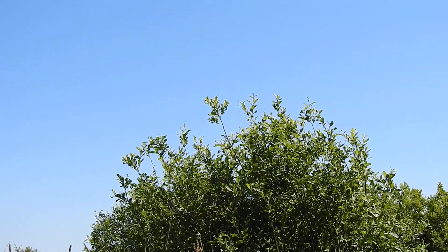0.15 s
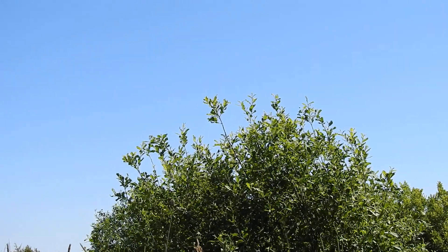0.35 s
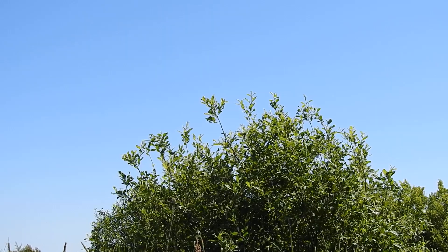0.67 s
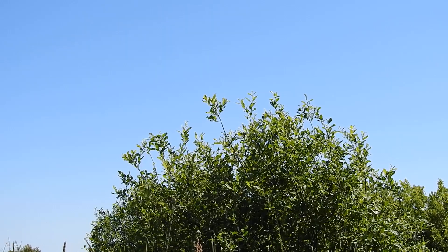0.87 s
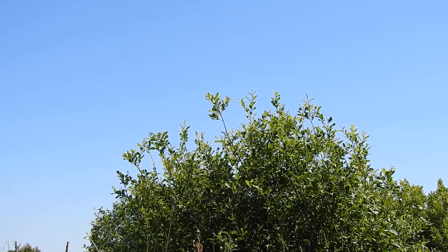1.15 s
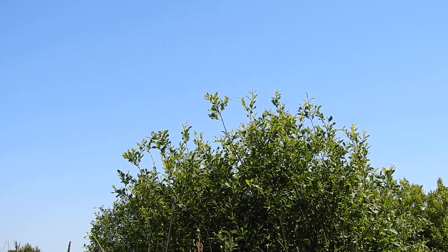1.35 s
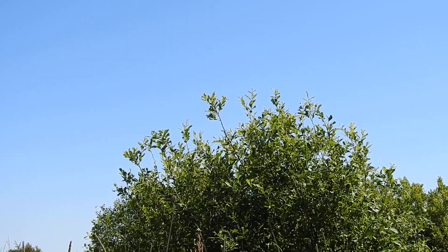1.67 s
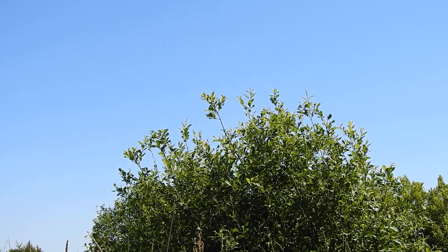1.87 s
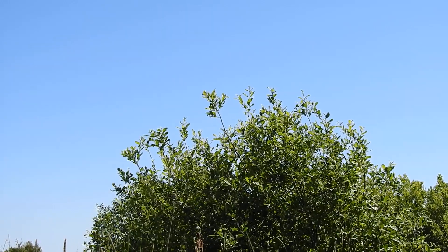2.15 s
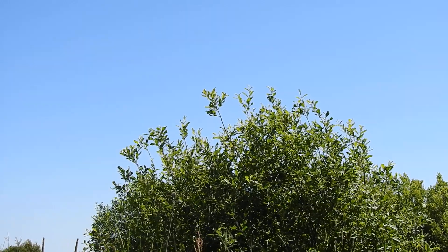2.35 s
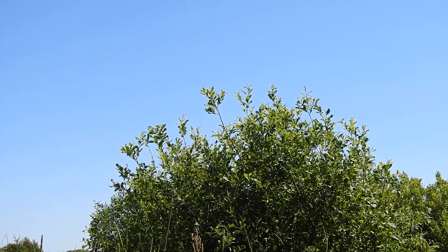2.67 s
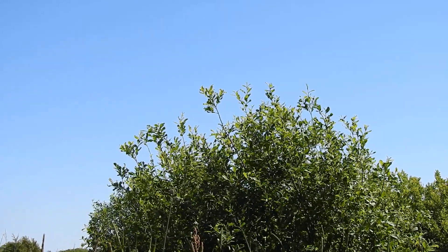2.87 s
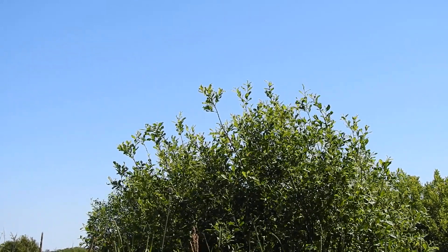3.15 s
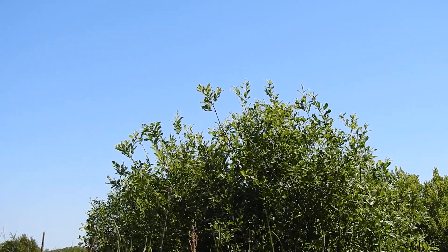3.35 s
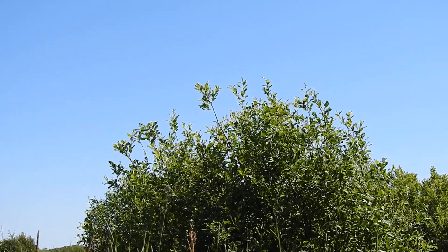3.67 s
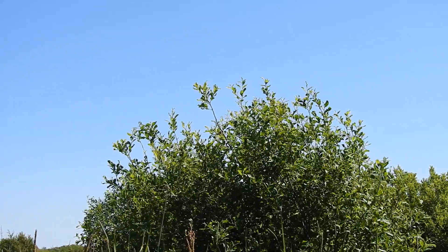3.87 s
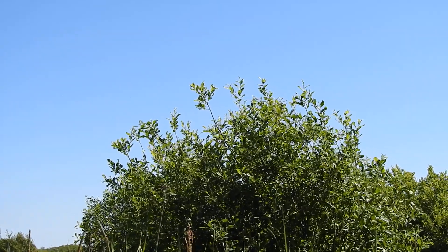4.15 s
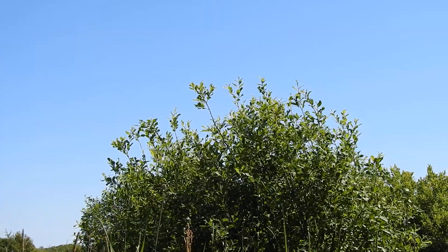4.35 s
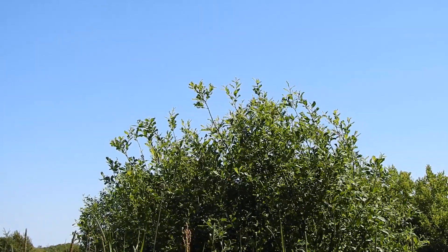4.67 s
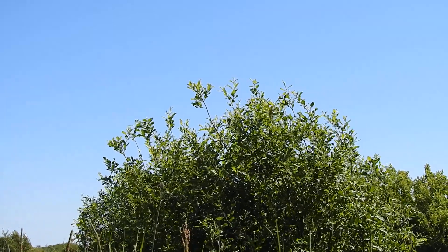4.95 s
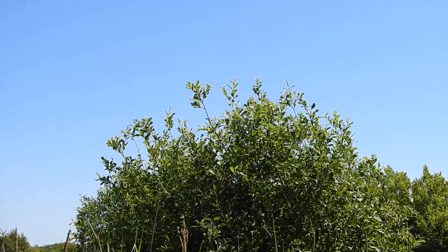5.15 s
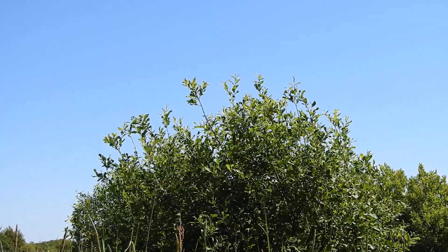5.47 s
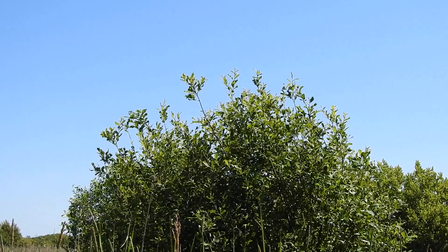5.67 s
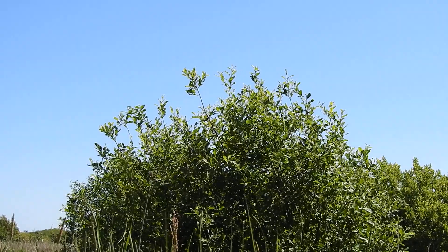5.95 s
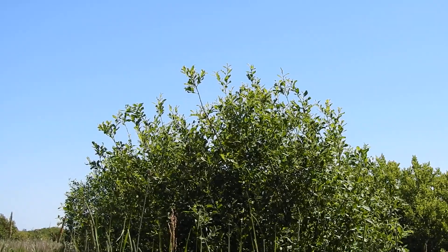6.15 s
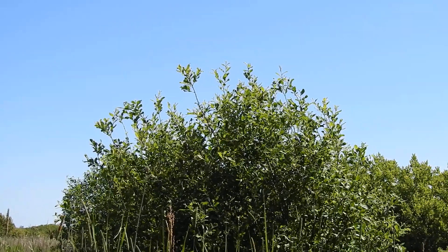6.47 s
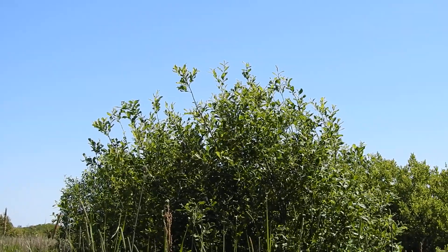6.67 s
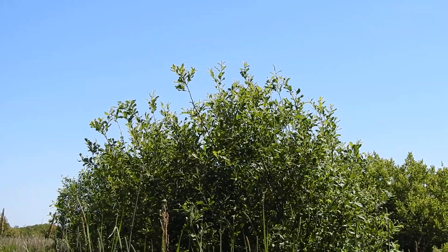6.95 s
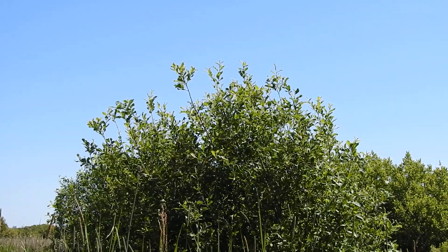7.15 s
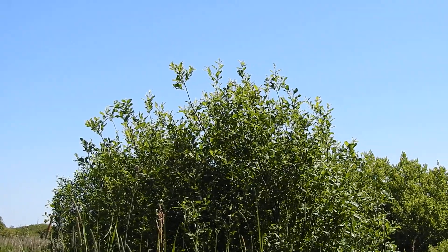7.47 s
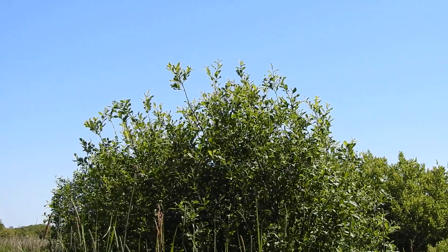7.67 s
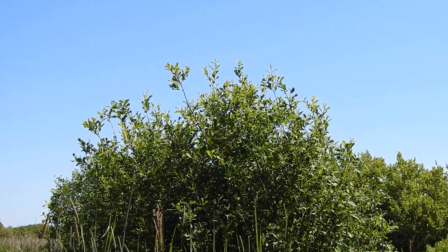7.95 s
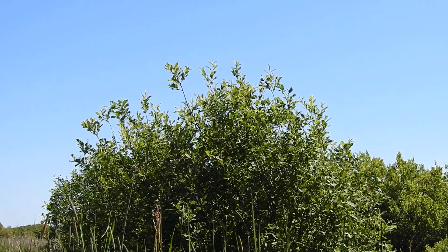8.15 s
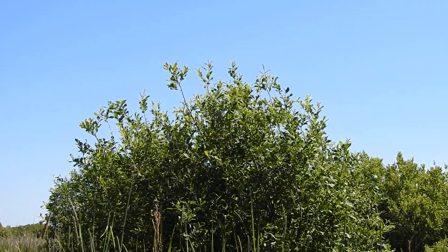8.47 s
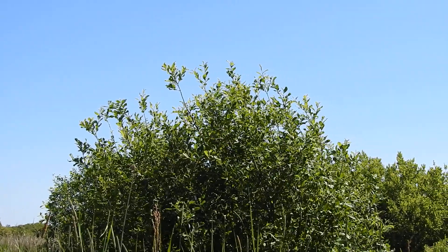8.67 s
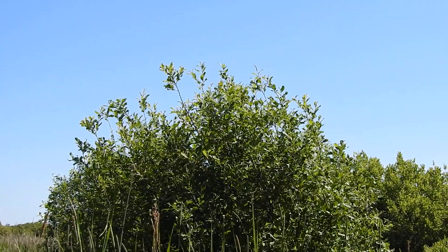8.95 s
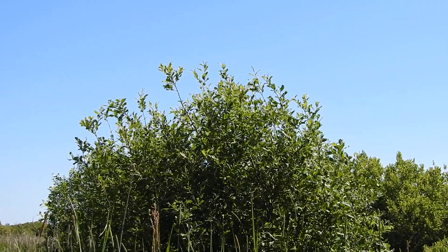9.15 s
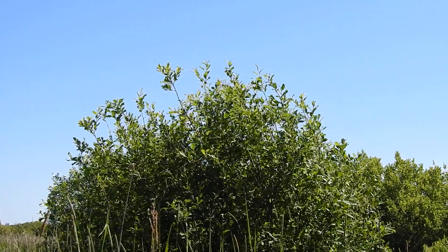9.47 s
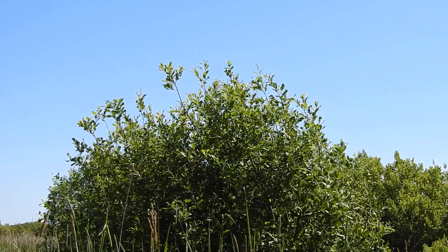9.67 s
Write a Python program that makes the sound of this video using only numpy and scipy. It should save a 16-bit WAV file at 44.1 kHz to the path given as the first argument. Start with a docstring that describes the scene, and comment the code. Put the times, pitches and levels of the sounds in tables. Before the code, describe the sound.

Quiet leaf hiss, a low far murmur and a barely audible hum lie under everything. Wind thumps the microphone at 0.1-0.5 s. A close warbler in the bush sings at 0.4 s: a bright rising note, two quick down-slurs, a mellow low whistle, and a rasp at 1.1. Farther birds twitter, chip and buzz until about 3.5, while gusts build from 2.2, with a left-side crackle at 3.1. The phrase returns at 3.7, with rasps at 4.4 and 4.65. Faint hoarse double clucks come near 5, and a dry twig snaps at 5.4. The third phrase starts at 5.55; the strongest gust roars and crackles on the left at 6.2, beside rasps at 6.3 and 6.5. A fourth phrase at 7 ends with one rasp at 7.7. Clucks return from 8 to 8.6 with another gust. The last phrase, at 9, ends with a rasp at 9.6.

```python
"""Leaf hiss, a far murmur and light wind come first: shaped noise, with gust turbulence on two microphone ports.
Farther birds warble and cluck in frequency glides; a twig ticks in brief modes; a narrow hum lies far away.
A near warbler in a willow bush repeats a phrase: a two-voiced rising note, two harmonic down-slurs,
a low near-sinusoidal whistle, and one or two frequency-modulated rasps. Foliage scatters its voice.
The strongest gusts crackle on the left port and drive a limiter."""
import sys
import numpy as np
from scipy import signal
from scipy.fft import rfft, irfft, next_fast_len
from scipy.io import wavfile
from scipy.ndimage import uniform_filter1d, minimum_filter1d, map_coordinates

SR = 44100
rng = np.random.default_rng(int(sys.argv[2]) if len(sys.argv) > 2 else 0)


def pcm_store(signal):
    """Save signal as 16-bit PCM."""
    levels = np.round(np.clip(np.atleast_2d(signal), -1, 1) * 32767)
    wavfile.write(sys.argv[1], SR, levels.astype(np.int16).T)


N = 432180  # samples


def amp(db):
    """Decibel definition: level to amplitude ratio."""
    return 10 ** (np.asarray(db) / 20)


def unit(x):
    """Normalisation to an rms of 1."""
    return x / np.sqrt(np.mean(x ** 2) + 1e-20)


def along(points, hz):
    """Interpolation of (f/Hz, value) points on a logarithmic frequency axis."""
    f, v = np.transpose(points)
    return np.interp(np.log(hz + 1), np.log(f), v)


def curves(rows, t):
    """Linear interpolation in time of each column after the first."""
    s, *columns = np.transpose(rows)
    return [np.interp(t, s, column) for column in columns]


def wobble(rate, size=N):
    """Band-limited random modulation: a smooth curve through `rate` random knots per second."""
    knots = rng.standard_normal(int(size * rate / SR) + 4)
    return map_coordinates(knots, [np.arange(size) * rate / SR])


def phase(hz):
    """Phase in radians as the time integral of frequency."""
    return 2 * np.pi * np.cumsum(hz) / SR


def progress(length):
    """Normalised time, 0 to 1 over a note of `length` seconds."""
    return np.linspace(0, 1, max(int(length * SR), 16))


def taper(u, rise, fall):
    """Raised-cosine swell and fade, given as shares of the note."""
    nearest_end = np.minimum(u / rise, (1 - u) / fall)
    return np.sin(np.pi / 2 * np.clip(nearest_end, 0, 1)) ** 2


def add(track, s, x):
    """Superposition of x on the track from time s."""
    part = track[max(round(s * SR), 0):][:len(x)]
    part += x[:len(part)]


def filtered(x, response):
    """Linear filtering: the spectrum of x times a response of frequency."""
    size = next_fast_len(N + 8192)
    return irfft(rfft(x, size) * response(np.fft.rfftfreq(size, 1 / SR)), size)[..., :N]


def ports(spectrum):
    """Incoherent turbulence: two independent coloured noises, overall rms 1."""
    return unit(filtered(rng.standard_normal((2, N)), lambda hz: amp(along(spectrum, hz))))


# Left-right correlation of diffuse sound: f/Hz, correlation [0-1]
CORRELATION = [(60, 0.31), (290, 0.55), (640, 0.56), (1400, 0.59), (3100, 0.49), (6800, 0.17), (15000, .05)]


def rush(spectrum):
    """Diffuse-field coherence: mid and side noise are weighted by frequency to set the left-right correlation."""
    def mid_side_weights(hz):
        angle = np.arccos(np.clip(along(CORRELATION, hz), -1, 1)) / 2
        return np.array([np.cos(angle), np.sin(angle)])
    mid, side = filtered(ports(spectrum), mid_side_weights)
    return unit(np.array([mid + side, mid - side]))


def scatter(x, t60s, width):
    """Multiple scattering by foliage: a stereo noise tail decays exponentially, at its own rate in each band."""
    hz, t, z = signal.stft(rng.standard_normal((2, SR // 2)), SR, nperseg=256)
    decay = amp(-60 * t / along(t60s, hz)[:, None])
    mid, side = signal.istft(z * decay, SR, nperseg=256)[1]
    tail = np.array([mid + width * side, mid - width * side])
    return signal.fftconvolve(x[None], tail / np.linalg.norm(tail[0]), axes=1)[:, :N]


def branches(x, reach=0.022, count=30):
    """Early reflection: many weak copies off the nearest branches, as an impulse response of unit energy."""
    delay, size = rng.random(count), rng.standard_normal(count)
    delay_samples = ((.002 + reach * delay ** 2) * SR).astype(int)
    taps = np.bincount(delay_samples, size * amp(-8 * delay))
    return signal.fftconvolve(x, taps / np.linalg.norm(taps))[:N]


# Slow course of the background: t/s, murmur level/dB and leaf hiss level/dB, both before offsets
BACKGROUND_LEVELS = [(0.0, -62.5, -54.5), (1.34, -60, -56.5), (1.69, -57, -57), (2.16, -60.5, -55),
                     (2.59, -61, -52), (3.36, -62.5, -54.5), (3.98, -58.5, -58), (4.34, -58.5, -58),
                     (4.56, -57, -58.5), (4.99, -57, -59.5), (5.54, -57.5, -56.5), (5.9, -62.5, -54.5),
                     (7.45, -59.5, -58.5), (7.94, -60, -57.5), (9.66, -60, -57), (9.8, -60.5, -58.5)]
# Spectrum of the far-off murmur: f/Hz, relative density/dB
MURMUR_SPECTRUM = [(20, 5), (60, 8.5), (150, 4.5), (290, 3), (420, -4), (700, -4), (1400, -9.5),
                   (3000, -14), (6000, -23.5), (15000, -28.5)]
# Spectrum of the leaf hiss: f/Hz, relative density/dB
LEAF_SPECTRUM = [(1000, -7.5), (3000, -5.5), (4500, -3), (5700, 0), (6700, 0.5), (8000, -10),
                 (10000, -16.5), (13000, -25), (15700, -45)]


def background(distance_db=6, leaves_db=2.0, hum_db=-60, hum_hz=306):
    """Superposed distant sources: diffuse low noise, level-modulated leaf hiss and a narrow-band hum."""
    low_db, leaf_db = curves(BACKGROUND_LEVELS, np.arange(N) / SR)
    far = amp(low_db + distance_db + 0.2 * wobble(4)) * rush(MURMUR_SPECTRUM)
    leaves = amp(leaf_db + leaves_db + 1.2 * wobble(11) + 0.62 * wobble(120)) * rush(LEAF_SPECTRUM)
    hum_tone = unit(np.sin(phase(hum_hz + 1.98 * wobble(24))))
    hum = amp(hum_db + 1.05 * wobble(7.3)) * hum_tone
    return far + leaves + hum


def turbulence(spectrum):
    """Envelope equalisation: rumble of nearly even strength on each port, so that other factors shape it."""
    x = ports(spectrum)
    return x / np.sqrt(np.abs(uniform_filter1d(x ** 2, size=1800)) + .02)


# Light breeze between the gusts: t/s, level/dB before flutter and the wind offset
BREEZE_LEVELS = [(0.0, -53.5), (0.62, -47), (1.2, -61), (2.0, -60.5), (2.55, -47), (3.45, -49), (3.85, -63),
                 (5.55, -71), (6.9, -50.5), (8.9, -44), (9.25, -61), (9.7, -48.5)]
# Gusts on the ports: t/s of the peak, length/s, level/dB before the wind offset, left minus right/dB
GUST_EVENTS = [(0.148, 0.099, -27.5, 7), (0.215, 0.033, -18, -16), (0.3, 0.085, -28.5, 0),
               (0.526, 0.08, -33.5, -1), (2.2, 0.08, -29.5, -8.5), (2.379, 0.12, -32, 5.5),
               (2.773, 0.18, -21.5, 2), (3.009, 0.073, -22.5, 9), (3.108, 0.074, -16, 14),
               (3.137, 0.17, -27.5, -2.5), (3.347, 0.13, -31.5, 23), (3.644, 0.071, -38.5, 21),
               (5.72, 0.1, -29.5, 1), (5.927, 0.063, -30, 14), (6.226, 0.33, -15, 4.5),
               (6.483, 0.23, -30, 1), (6.744, 0.13, -39, -9), (7.104, 0.054, -34.5, -6),
               (7.295, 0.04, -36.5, -13), (7.461, 0.15, -28.5, 15), (7.603, 0.27, -32.5, -11),
               (7.852, 0.062, -34.5, 4), (7.963, 0.048, -29.5, 11), (8.172, 0.116, -32.5, 12),
               (8.447, 0.085, -26, -13), (8.625, 0.085, -20, -1), (8.725, 0.077, -32.5, 1),
               (9.554, 0.055, -33.5, -8)]
GUST_EDGE_DB, GUST_CURVE = 10, 2.15  # drop in dB at half a length from the peak; exponent of the drop


def wind_power(flutter_db=4):
    """Addition of incoherent powers: a fluttering breeze plus gusts that swell and die away, panned by level."""
    t = np.arange(N) / SR
    breeze_db, = curves(BREEZE_LEVELS, t)
    power = amp(breeze_db + flutter_db * np.array([wobble(16), wobble(14)])) ** 2
    for s, length, db, pan_db in GUST_EVENTS:
        span = slice(max(int((s - 2 * length) * SR), 0), int((s + 2 * length) * SR))
        from_peak = np.abs(2 * (t[span] - s) / length)
        swell = amp(db - GUST_EDGE_DB * from_peak ** GUST_CURVE) ** 2
        left = 1 / (1 + amp(-2 * pan_db))  # share of the power
        power[:, span] += 2 * np.outer([left, 1 - left], swell)
    return power


# Spectrum of the gust rumble: f/Hz, relative density/dB
BUFFET_SPECTRUM = [(20, -20), (45, 1.5), (70, 8), (95, 2.5), (130, -1), (170, -9), (215, -19), (280, -37.5),
                   (400, -53.5), (700, -74)]
# Spectrum of the sharper turbulence: f/Hz, relative density/dB
EDDY_SPECTRUM = [(25, -32), (60, -2), (100, 4.5), (170, -5.5), (250, -16.5), (500, -44), (1500, -58),
                 (5000, -82)]
# Sharp eddies, mostly on the left port: t/s of the peak, length/s, level/dB before the port's low cut
EDDY_EVENTS = [(3.125, 0.01, -14), (6.23, 0.024, -8), (6.278, 0.037, -8)]


def wind(level_db=1.75, hiss_db=-10, low_cut_hz=56):
    """Turbulent pressure at each port: independent noise in thumps, with more high-frequency energy in hard gusts."""
    t = np.arange(N) / SR
    power = wind_power()
    db = 10 * np.log10(power.mean(axis=0))
    force = amp(level_db) * np.sqrt(power)
    lumps = amp(4.5 * np.array([wobble(55), wobble(55)]))
    thumps = lumps / np.sqrt(uniform_filter1d(lumps ** 2, size=5000))
    hiss = amp(hiss_db + 0.71 * (db + 17)) * ports(EDDY_SPECTRUM)
    gusts = force * thumps * (turbulence(BUFFET_SPECTRUM) + hiss)
    burst = np.zeros(N)
    for s, length, level in EDDY_EVENTS:
        burst += amp(level - 3.2 * np.minimum(((t - s) / length) ** 2, 30))
    eddies = burst * turbulence(EDDY_SPECTRUM) * amp([[0], [-18]])  # left, right
    # the small microphones lose the deepest bass
    return filtered(gusts + eddies, lambda hz: 1 / np.sqrt(1 + (low_cut_hz / (hz + 1)) ** 6))


# Crackles of the overloaded left port: t/s, level/dB before the pulse shape
CRACKLE_EVENTS = [(3.121, -18.5), (6.215, -19), (6.239, -16), (6.26, -7.5), (6.283, -11)]


def crackles(decay=0.00072):
    """Overload transient: at the height of a gust the left microphone bottoms out in short, dull snaps."""
    out, t = np.zeros(N), np.arange(SR // 100) / SR
    pulse = (1 - t / decay) * np.exp(-t / decay) * (1 - np.exp(-t / .0001))
    for s, db in CRACKLE_EVENTS:
        add(out, s, amp(db) * pulse)
    return out * amp([[0], [-20]])  # left, right


# Twig ticks: t/s, level/dB before the modes are summed, central ring f/Hz
TICK_EVENTS = [(5.054, -39, 5770), (5.363, -32.5, 3000), (5.373, -22, 5770)]


def ticks(t60=0.012):
    """Modal superposition: a dry twig snaps in a few rapidly decaying modes with a faint noise crack."""
    out, t = np.zeros(N), np.arange(SR // 20) / SR
    attack = 1 - np.exp(-t / .0002)
    for s, db, hz in TICK_EVENTS:
        ring = np.zeros(len(t))
        for ratio in (.8, .9, 1.08, 1.19):
            ring += np.sin(2 * np.pi * hz * ratio * t + 2 * np.pi * rng.random()) / 3
        crack = .08 * rng.standard_normal(len(t))
        add(out, s, amp(db - 60 * t / t60) * attack * (ring + crack))
    return out


def glide(length, first_hz, last_hz, rough):
    """Frequency modulation: a gliding note of rms 1, whose pitch shakes into a buzz when rough."""
    u = progress(length)
    shake = .008 * wobble(120, len(u)) + .06 * rough * wobble(900, len(u))
    hz = (first_hz + (last_hz - first_hz) * u) * (1 + shake)
    return unit(np.sin(phase(hz)) * taper(u, .2, .15))


# Double clucks of a distant bird: t/s, level/dB before the mix
CLUCK_EVENTS = [(4.877, -52), (5.124, -51.5), (7.998, -50), (8.267, -50.5), (8.509, -52.5)]
CLUCK_GAP_S, CLUCK_STEP, CLUCK_STEP_DB = 0.057, 1.12, -4.5  # second cluck: delay, pitch ratio, level step


def clucks(length_s=0.0109, first_hz=2150, last_hz=1900, low_hz=1280, low_db=-7, low_lag_s=0.0073):
    """Random frequency modulation: a short hoarse chip and a lower, weaker one; each pair's second chip is higher."""
    out = np.zeros(N)
    rough = 0.9
    for s, db in CLUCK_EVENTS:
        pair = [(s, 1, db), (s + CLUCK_GAP_S, CLUCK_STEP, db + CLUCK_STEP_DB)]
        for start, ratio, level in pair:
            add(out, start, amp(level) * glide(length_s, ratio * first_hz, ratio * last_hz, rough))
            add(out, start + low_lag_s, amp(level + low_db) * glide(length_s, low_hz, low_hz, rough))
    return out


# Gliding notes of the farther birds, clean or buzzing:
# t/s, length/s, first f/Hz, last f/Hz, level/dB before the mix, roughness [ratio]
WARBLE_NOTES = [(0.062, 0.02, 2680, 2550, -55.5, 0.6), (0.692, 0.04, 2325, 2100, -57.5, 0.3),
                (0.784, 0.069, 3070, 3250, -53.5, 1.02), (0.977, 0.15, 2477, 2342, -58, 0.37),
                (1.234, 0.06, 2820, 2680, -45.5, 0.3), (1.576, 0.13, 4455, 3950, -50, 0.22),
                (1.653, 0.093, 1595, 2024, -55.5, 1.05), (1.77, 0.049, 2860, 3330, -51.5, 0.8),
                (1.811, 0.06, 3360, 3900, -54.5, 1.1), (1.88, 0.036, 5100, 4830, -56, 0.8),
                (2.045, 0.046, 2980, 3100, -47.5, 0.1), (2.165, 0.039, 3023, 3094, -44.5, 0.25),
                (2.27, 0.036, 3700, 4450, -53.5, 1), (2.31, 0.046, 3690, 3530, -54, 0.45),
                (2.356, 0.1, 3024, 3275, -47, 0.1), (2.51, 0.11, 2380, 2714, -50.5, 0.47),
                (2.709, 0.057, 4560, 3670, -46.5, 0.58), (2.865, 0.098, 1830, 2235, -58, 0.4),
                (2.89, 0.068, 3230, 3350, -54, 0.23), (2.928, 0.086, 3580, 4550, -50.5, 0.4),
                (3.037, 0.05, 3340, 3300, -49, 0.1), (3.276, 0.044, 1560, 1990, -58.5, 0.8),
                (3.384, 0.076, 3660, 2140, -53.5, 1.2), (8.248, 0.047, 5200, 4750, -58.5, 1),
                (8.579, 0.082, 3010, 3130, -54.5, 0.8)]
# Falling chips of the farther birds: t/s, length/s, starting f/Hz, level/dB before the mix
CHIP_NOTES = [(1.38, 0.039, 2510, -55), (1.498, 0.058, 2870, -55.5), (1.933, 0.02, 3380, -49),
              (2.003, 0.017, 3350, -47.5), (2.084, 0.031, 2925, -48.5), (2.207, 0.029, 2880, -49.5),
              (2.292, 0.058, 3310, -52), (2.558, 0.024, 3440, -46.5), (2.715, 0.019, 2780, -50),
              (3.01, 0.036, 4360, -51.5), (3.161, 0.03, 2970, -50.5), (8, 0.034, 3050, -57)]
# A short run of upward pips: t/s, level/dB before the mix
PIP_NOTES = [(1.308, -52), (1.344, -46.5), (1.373, -53)]
CHIP_FALL_OCT_PER_S, CHIP_ROUGH = 11, 0.38  # the fall sets each chip's last pitch; pips share the roughness


def warble(pip_s=0.0115, pip_first_hz=2350, pip_last_hz=2750):
    """Linear frequency sweeps: farther birds mix clean or buzzing glides, falling chips and a few upward pips."""
    out = np.zeros(N)
    for s, length, first_hz, last_hz, db, rough in WARBLE_NOTES:
        add(out, s, amp(db) * glide(length, first_hz, last_hz, rough))
    for s, length, hz, db in CHIP_NOTES:
        last_hz = hz * 2 ** (-CHIP_FALL_OCT_PER_S * length)
        add(out, s, amp(db) * glide(length, hz, last_hz, CHIP_ROUGH))
    for s, db in PIP_NOTES:
        add(out, s, amp(db) * glide(pip_s, pip_first_hz, pip_last_hz, CHIP_ROUGH))
    return out


# Rasps: t/s, length/s, sweep cycles per s, centre f/Hz, level/dB before beak and mix, opening sweep/dB
RASP_NOTES = [(1.099, 0.073, 98, 5580, -35, -11), (4.401, 0.063, 90, 5420, -36.5, -6.5),
              (4.646, 0.05, 88, 6025, -33.5, 2.5), (6.265, 0.047, 142, 5830, -34.5, -9),
              (6.527, 0.047, 100, 6030, -33, 4), (7.694, 0.057, 85, 5455, -35.5, -9),
              (9.619, 0.069, 92, 5820.0, -34.5, -6)]
# Response of the open beak in a rasp: f/Hz, gain/dB
BEAK_RESPONSE = [(1500, -14.5), (2500, -4), (4000, -3.5), (5200, 2.5), (6400, 1.5), (7100, -8.5),
                 (8000, -6), (10000, -26)]


def rasps(swing_hz=1080, climb_hz=750, jitter_hz=380, sub_db=-16, pulse_db=10.5, air_db=-15):
    """Joint frequency and amplitude modulation: a tone sweeps and pulses, with a weak sub-octave and rushing air."""
    out = np.zeros(N)
    for s, length, rate, centre_hz, db, opening_db in RASP_NOTES:
        u = progress(length)
        turn = phase(rate * (1 + 0.1166 * wobble(87.6, len(u))))
        settled = np.clip(turn / np.pi - 1, 0, 1)  # clean for half a cycle, then increasingly rough
        jitter = jitter_hz * settled * wobble(1521, len(u))
        hz = centre_hz + swing_hz * np.cos(turn) + climb_hz * (u - .5) + jitter
        pulse = amp(pulse_db * np.sin(turn + 0.32) + opening_db * (1 - settled)) * taper(u, 0.021, 0.31)
        air = amp(air_db) * settled * wobble(4000, len(u)) * np.sin(phase(0.52 * hz))
        tone = np.sin(phase(hz)) + amp(sub_db) * np.sin(phase(hz) / 2)
        add(out, s, amp(db) * unit(pulse * (tone + air)))
    return filtered(out, lambda hz: amp(along(BEAK_RESPONSE, hz)))


# Low whistles: t/s, length/s, base f/Hz, opening dip/Hz, closing sag/Hz, level/dB before envelope and mix,
# closing fade/dB
WHISTLE_NOTES = [(0.766, 0.21, 2616, 12, 95, -40.5, 7), (4.076, 0.24, 2667, 190, 76, -40, 5),
                 (5.93, 0.26, 2617, 45, 235, -37.5, 20), (7.351, 0.25, 2641, 140, 77, -36.5, 4),
                 (9.309, 0.2, 2630, 120, 253, -35, 4.5)]
SCOOP_AT_S, SCOOP_WIDTH_S = 0.0245, 0.0314  # centre and width of the opening dip in pitch
SAG_CURVE = 3.54  # exponent: the sag and the fade come late in the note


def whistles(octave_db=-33, onset_db=14, onset_s=0.037, waver=0.0058):
    """Near-sinusoidal tone: a wavering fundamental with a faint octave dips and recovers, holds, then sags and fades."""
    out = np.zeros(N)
    for s, length, pitch_hz, scoop_hz, sag_hz, db, fade_db in WHISTLE_NOTES:
        u = progress(length)
        t, late = u * length, u ** SAG_CURVE
        scoop = scoop_hz * np.exp(-((t - SCOOP_AT_S) / SCOOP_WIDTH_S) ** 2)
        hz = pitch_hz - scoop - sag_hz * late
        level = db - onset_db * np.exp(-t / onset_s) - fade_db * late
        gain = np.sqrt(2) * amp(level) * taper(u, 0.058, 0.12)
        tone = phase(hz * (1 + waver * wobble(72.5, len(u))))
        add(out, s, gain * (np.sin(tone) + amp(octave_db) * np.sin(2 * tone)))
    return out


# Pairs of down-slurs: t/s of the first, t/s of the second, length/s, reference f/Hz, level/dB before step and mix
SLUR_NOTES = [(0.527, 0.638, 0.044, 1750, -43), (3.832, 3.944, 0.05, 1810, -46),
              (5.716, 5.816, 0.044, 1876, -41.5), (7.126, 7.223, 0.039, 1730, -41.5),
              (9.112, 9.213, 0.041, 1772, -40)]
# The two slurs of a pair: start over the reference pitch [ratio], last f/Hz, level step/dB,
# share of the note at which the upper harmonics are fully open [0-1]
SLUR_SHAPES = [(0.98, 960, -0.5, 0.26), (0.84, 890, -3, 0.5)]
# Response of the throat: f/Hz, gain/dB
THROAT_RESPONSE = [(900, -49), (1800, -12), (2500, 1), (3300, 1), (4300, 1.5), (5200, -4), (6400, -4),
                   (7500, -34), (10000, -36.5)]


def slurs(third_db=8, closed_db=20, rough=0.19):
    """Source-filter principle: falling harmonic stacks pass the throat; the upper harmonics, led by the third, open."""
    out = np.zeros(N)
    for first_s, second_s, length, pitch_hz, db in SLUR_NOTES:
        u = progress(length)
        for s, (ratio, last_hz, step_db, opening) in zip((first_s, second_s), SLUR_SHAPES):
            waver = 1 + .005 * wobble(600, len(u))
            hz = (ratio * pitch_hz * (1 - u) + last_hz * u) * waver
            closed = np.clip((opening - u) / 0.22, 0, 1)
            stack = np.zeros(len(u))
            for k in range(1, 7):
                lift_db = (k == 3) * third_db - (k > 2) * closed_db * closed
                stack += amp(along(THROAT_RESPONSE, k * hz) + lift_db) * np.sin(k * phase(hz))
            shape = taper(u, 0.096, 0.021) * (1 + rough * wobble(347, len(u)))
            add(out, s, amp(db + step_db) * unit(stack * shape))
    return out


# Rising notes: t/s of the crest, climb/s, drop/s, base f/Hz, height of the climb/Hz, level/dB before envelope and mix
RISING_NOTES = [(0.463, 0.11, 0.022, 4750, 140, -29), (3.785, 0.13, 0.025, 4730, 206, -31.5),
                (5.654, 0.11, 0.033, 4770, 10, -29.5), (7.052, 0.1, 0.041, 4750, 320, -27),
                (9.044, 0.087, 0.025, 4805, 330, -26)]
SWELL_DB, SWELL_CURVE = 26, 1.7  # the voice grows as it climbs, levelling off at the crest
DROP_HZ, DROP_DB = 240, 1  # lost after the crest
KICK_HZ, KICK_S = 155.3, 0.034  # the pitch arches above the base pitch around the crest


def rising_notes(low_first_hz=3330, low_last_hz=4250, lower_db=-22, upper_db=-21, outer_db=-36):
    """Nonlinear two-source mixing: both sides of the syrinx sing and converge, with combination tones around."""
    out = np.zeros(N)
    for crest, climb_s, drop_s, held_hz, climb_hz, db in RISING_NOTES:
        u = progress(climb_s + drop_s)
        t = u * (climb_s + drop_s) - climb_s
        before, after = np.maximum(-t / climb_s, 0), np.maximum(t / drop_s, 0)
        kick = KICK_HZ * np.exp(-(t / KICK_S) ** 2)
        hz = held_hz - climb_hz * before ** 2 - DROP_HZ * after + kick
        level = db - SWELL_DB * before ** SWELL_CURVE - DROP_DB * after
        gain = np.sqrt(2) * amp(level) * taper(u, 0.035, 0.11)
        high_waver, low_waver = 1 + .0025 * wobble(200, len(u)), 1 + .007 * wobble(300, len(u))
        high = phase(hz * high_waver)
        low = phase((low_first_hz + (low_last_hz - low_first_hz) * u) * low_waver)
        # relative to the main voice, the lower one is strongest at both ends of the note
        ends_db = 48 * (u - .58) ** 2
        lower = amp(lower_db + ends_db) * np.sin(low)
        upper = amp(upper_db) * np.sin(2 * high - low)
        outer = amp(outer_db) * (np.sin(3 * high - 2 * low) + np.sin(2 * low - high))
        flutter = 1 + .3 * wobble(150, len(u))
        add(out, crest - climb_s, gain * (np.sin(high) + flutter * (lower + upper + outer)))
    return out


# Decay of the scattered sound in the bush: f/Hz, T60/s
BUSH_DECAY = [(500, .2), (3000, 0.31), (6000, 0.25), (12000, 0.033)]
# Decay of the scattered sound in the open field: f/Hz, T60/s
FIELD_DECAY = [(500, 0.27), (3000, 0.47), (8000, 1)]


def scene():
    """Superposition of direct and scattered sound: background, wind, field birds and the near singer in its bush."""
    rising, whistled = amp(0.5) * rising_notes(), amp(0.1) * whistles()
    slurred, rasped = amp(-0.3) * slurs(), amp(-2.5) * rasps()
    direct = rising + whistled + slurred + rasped
    early = amp(-11) * branches(rising) + amp(-3.5) * branches(slurred) + amp(-0.5) * branches(rasped)
    # the low whistle passes the leaves almost unscattered
    leak = amp(-17) * whistled
    bush_send = amp(-11) * rising + leak + amp(-10.0) * slurred + amp(-7) * rasped
    bush = scatter(bush_send, BUSH_DECAY, width=0.54)
    distant, clucking = amp(-2.0) * warble(), amp(3.5) * clucks()
    field_send = amp(2.5) * distant + amp(-2) * clucking
    field = amp(-1) * branches(distant) + scatter(field_send, FIELD_DECAY, width=0.56)
    singer = direct + early + bush
    far_birds = distant + clucking + field
    return singer + far_birds + ticks() + wind() + crackles() + background()


TOP_HZ = 15740  # upper band limit


def record(dry, ceiling=0.578, overshoot=1.3):
    """Peak limiting: gain falls in loud passages, what still exceeds the ceiling clips, then the band is limited."""
    needed = np.minimum(1, ceiling * overshoot / (np.abs(dry) + 1e-9))
    gain = uniform_filter1d(minimum_filter1d(needed, size=500), size=500)
    clipped = np.clip(dry * gain, -ceiling, ceiling)
    return filtered(clipped, lambda hz: hz < TOP_HZ)


dry = scene()
out = record(dry)
pcm_store(out)
```